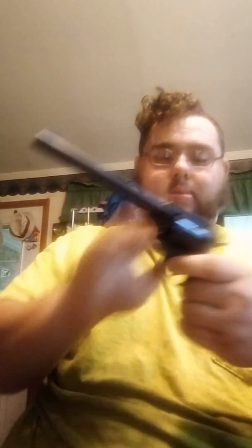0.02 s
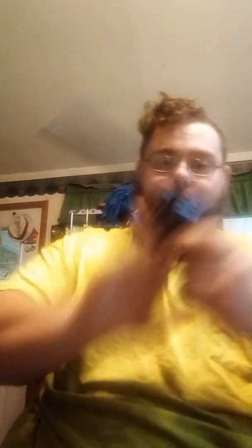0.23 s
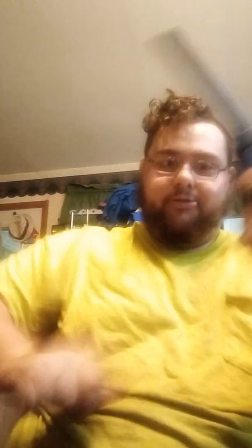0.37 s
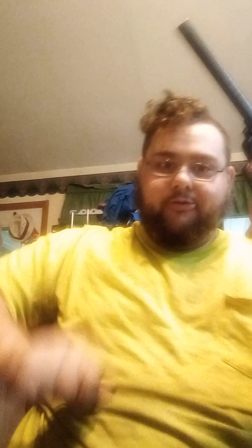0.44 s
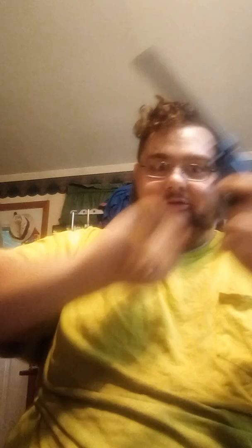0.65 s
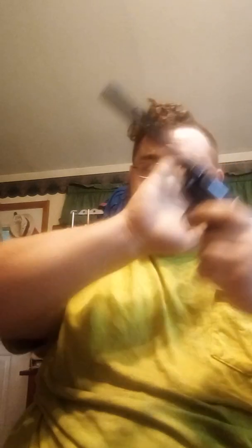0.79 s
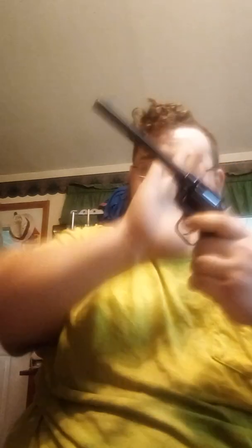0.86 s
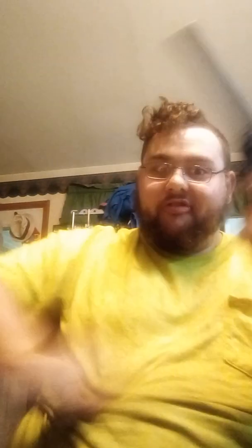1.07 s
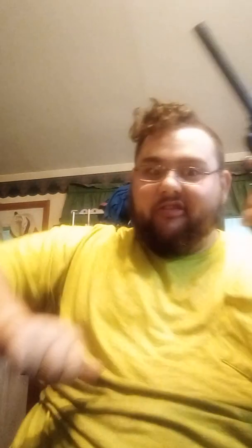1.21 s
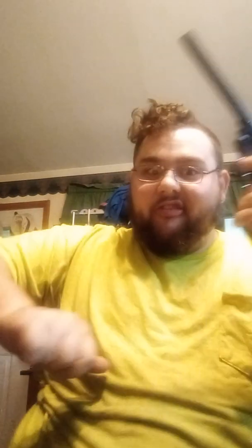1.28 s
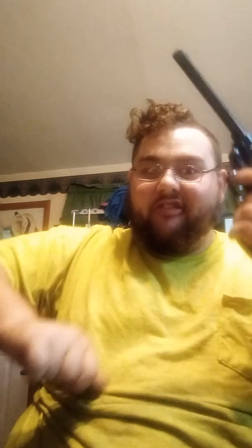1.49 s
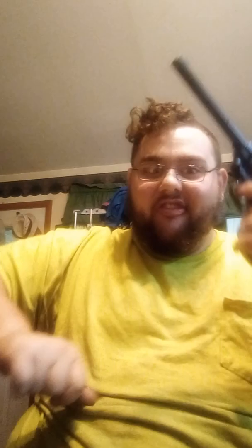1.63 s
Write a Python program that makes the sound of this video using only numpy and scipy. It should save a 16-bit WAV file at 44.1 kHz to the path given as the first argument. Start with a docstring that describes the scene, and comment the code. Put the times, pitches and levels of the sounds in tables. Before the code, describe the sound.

A revolver's cylinder is spun twice by hand, close to the microphone in a small room. Each run of rapid, bright clicks slows and settles with a clink; the second ends in a falling squeak.

```python
"""A small room with a low hum: a revolver's cylinder is spun twice by hand, close to a phone.
The pawl snaps over the ratchet, quickly and then ever more slowly; a duller tock follows each snap.
A grainy hiss of friction and room tail swells after each run of snaps; the cylinder settles with a clink.
The second spin ends in a falling squeak. Between the spins come faint, high brushing sounds,
a swish of the arm and a slap of the hand on the cylinder."""
import sys
import numpy as np
from scipy import signal
from scipy.fft import rfft, irfft
from scipy.io import wavfile

SR = 44100
rng = np.random.default_rng(int(sys.argv[2]) if len(sys.argv) > 2 else 0)


def file_out(sig):
    """Save sig as 16-bit WAV at sys.argv[1]."""
    # one column per channel
    cols = np.atleast_2d(sig).T
    # limit, then scale
    lim = np.clip(cols, -1, 1)
    pcm = np.round(lim * 32767).astype(np.int16)
    wavfile.write(sys.argv[1], SR, pcm)


N = 72765

# pawl snaps: start_s, crack_db, ring_db, knock_db
PAWL_SNAPS = [(0.2183, -25.0, -21.0, -49.0), (0.2306, -27.0, -20.0, -54.0), (0.2403, -25.0, -25.0, -56.0),
              (0.2492, -27.0, -25.0, -49.0), (0.2589, -28.0, -21.0, -41.0), (0.2686, -29.0, -22.0, -43.0),
              (0.2783, -28.0, -21.0, -38.0), (0.2886, -28.0, -22.0, -38.0), (0.299, -27.0, -22.0, -40.0),
              (0.3102, -27.0, -17.0, -49.0), (0.322, -27.0, -18.0, -44.0), (0.3349, -28.0, -18.0, -39.0),
              (0.349, -29.0, -20.0, -46.0), (0.3649, -31.0, -20.0, -52.0), (0.383, -31.0, -24.0, -62.0),
              (0.4043, -30.0, -21.0, -66.0), (0.4337, -31.0, -24.0, -62.0), (0.9374, -24.0, -23.0, -48.0),
              (0.9476, -23.0, -20.0, -41.0), (0.9556, -26.0, -23.0, -45.0), (0.9631, -25.0, -23.0, -44.0),
              (0.9719, -28.0, -21.0, -49.0), (0.98, -26.0, -22.0, -45.0), (0.9882, -26.0, -19.0, -42.0),
              (0.9963, -27.0, -22.0, -46.0), (1.0049, -27.0, -22.0, -58.0), (1.0137, -28.0, -26.0, -54.0),
              (1.0231, -27.0, -26.0, -52.0), (1.0328, -27.0, -24.0, -52.0), (1.0432, -28.0, -24.0, -48.0),
              (1.0543, -29.0, -22.0, -53.0), (1.0662, -29.0, -23.0, -46.0), (1.0788, -29.0, -24.0, -58.0),
              (1.0921, -29.0, -22.0, -61.0), (1.1064, -28.0, -22.0, -51.0), (1.122, -29.0, -22.0, -61.0),
              (1.1398, -31.0, -23.0, -59.0), (1.1612, -30.0, -29.0, -59.0), (1.1907, -28.0, -28.0, -68.0)]
# crack spectrum: freq_hz, gain_db
CRACK_SPECTRUM = [(1000, -29), (2300, -11), (3600, -2), (4400, -0.5), (5300, 5.5), (6600, 8), (7700, -1),
                  (9300, 7), (11000, 0.5), (12000, 1.5), (12800, 0), (15000, -0.5), (18000, -21)]
# pawl modes: freq_hz, level_db, t60_s
PAWL_MODES = [(15500, -4, 0.005), (15520, 12, 0.011), (15500, 2, 0.0074), (16100, 5, 0.0067),
              (17400, -8, 0.0048)]
# tock modes: freq_hz, level_db, t60_s
TOCK_MODES = [(1533, -7.5, 0.014), (2326, -9.5, 0.017), (3130, 1, 0.0093), (3450, 3.5, 0.0093),
              (5560, -8, 0.013)]
# frame knock high-pass, thinner on the second spin: time_s, cutoff_hz
KNOCK_LOW_CUT = [(.25, 59), (.94, 212)]
# grainy hiss envelope: time_s, level_db
GRAINY_HISS_ENVELOPE = [(.175, -79.5), (.21, -49.5), (.23, -37), (.3, -39.5), (.44, -41), (.5, -37),
                        (.54, -48), (.6, -56.5), (.75, -68.5), (.85, -92), (.93, -66), (.95, -37.5),
                        (1.2, -38.5), (1.26, -34), (1.31, -34), (1.37, -41.5), (1.42, -43), (1.48, -50),
                        (1.53, -69.5), (1.65, -72)]
# grainy hiss spectrum: freq_hz, gain_db
GRAINY_HISS_SPECTRUM = [(400, -34), (900, -20.5), (1400, -18.5), (1800, -10), (2400, -2), (3300, -4.5),
                        (4400, -10), (5400, 5), (6200, -3.5), (7000, 2), (8200, -9.5), (9500, -3.5),
                        (10600, -6), (11600, -3.5), (13000, -9.5), (14300, -1), (15100, 6), (16200, 7.5),
                        (17200, -7.5), (18000, -13)]
# squeak of the stopping cylinder: time_s, pitch_hz, level_db
SQUEAK_TRACK = [(1.17, 1450, -110), (1.21, 1428, -57), (1.245, 1370, -45.5), (1.28, 1210, -43),
                (1.295, 950, -42.5), (1.35, 930, -52), (1.4, 925, -51.5), (1.46, 952, -60),
                (1.53, 1000, -68.5), (1.65, 945, -72.5)]
# squeak harmonics: multiple, level_db
SQUEAK_HARMONICS = [(1, -3), (2, 7.5), (3, 4), (4, -32)]
# clinks as each spin starts and ends: start_s, level_db
CYLINDER_CLINKS = [(0.209, -41), (0.5302, -32), (0.9411, -31.5), (1.2895, -34)]
# cylinder modes: freq_hz, level_db, t60_s
CYLINDER_MODES = [(1840, -9.5, 0.0067), (2220, -19, 0.26), (2330, -18, 0.1), (2370, 3.5, 0.025),
                  (2700, 1.5, 0.0084), (3220, 1.5, 0.0083), (3590, -7, 0.016), (4048, -17, .03),
                  (6020, -8, 0.022)]
# high brushing sounds: start_s, length_s, level_db, resonance_hz, width_hz
BRUSH_EVENTS = [(.2045, .002, -46, 7000, 5000), (.628, .02, -56, 5700, 1200),
                (.6528, .013, -50, 5700, 1400), (.675, .014, -53, 5600, 1100), (.69, .036, -58, 5600, 1500),
                (.7405, .006, -56, 5600, 1800), (.7695, .033, -55, 5700, 2000),
                (.8675, .006, -57, 6400, 500), (.894, .02, -57, 5500, 1200), (.9235, .002, -45, 9000, 6000)]
# brushing spectrum: freq_hz, gain_db
BRUSH_SPECTRUM = [(1500, -32), (3500, -19), (5000, 1), (6200, 3.5), (7200, -5.5), (9500, 5.5), (12000, -10),
                  (16000, -35)]
# soft hand blows: start_s, level_db, pitch_hz, t60_s
HAND_THUMPS = [(.548, -54.5, 564, 0.052), (.735, -58, 71, 0.031), (0.89, -58, 1100, 0.13),
               (0.901, -57, 79, .08), (.9158, -36.5, 373, 0.02), (.9172, -34, 520, 0.015),
               (.9165, -39, 1400, 0.0053), (1.109, -60.5, 70, 0.04), (1.21, -64.5, 65, 0.16),
               (1.332, -60, 75, 0.045)]
# arm swish envelope: time_s, level_db
SWISH_ENVELOPE = [(0, -79), (.5, -79), (.56, -52), (.6, -73.5), (.8, -71), (.86, -62.5), (.91, -50),
                  (1.1, -69.5), (1.3, -57.5), (1.45, -59.5), (1.53, -58), (1.65, -64.5)]
# swish spectrum: freq_hz, gain_db
SWISH_SPECTRUM = [(100, 3.5), (250, -3), (600, -1), (1100, -0.5), (1700, -3.5), (3000, -4), (4200, -2.5),
                  (6000, -2), (7200, -6.5), (9000, -28), (16000, -9)]
# room tail spectrum: freq_hz, gain_db
ROOM_SPECTRUM = [(150, -5), (700, -8.5), (1500, -4), (2400, -0.5), (3500, 6.5), (6000, -4.5), (9000, 0),
                 (13000, -10), (16000, -31)]
# room hum bands: centre_hz, width_hz, level_db
HUM_BANDS = [(119.4, 15, -6), (164.6, 23, -2.5), (325, 113, -1.5), (373.4, 47, -5.5), (228, 86, -14.5),
             (620, 79, -14.5), (983, 170, -14)]
# hum envelope: time_s, level_db
HUM_ENVELOPE = [(0, -66.5), (.18, -59.5), (.25, -64), (.46, -89), (.51, -64), (.6, -66), (.7, -60),
                (.9, -63.5), (1, -65.5), (1.19, -90), (1.27, -61), (1.52, -64.5), (1.65, -64)]
# background hiss spectrum: freq_hz, gain_db
HISS_SPECTRUM = [(30, -14), (70, 23), (400, 7), (800, -7), (2000, 4.5), (5500, -38.5), (7000, -30.5),
                 (9000, -50), (13000, -62), (15500, -24), (18000, -54)]


def ratchet(chatter_s=0.0025, chatter_fall_s=0.006, release_s=0.00053, crack_fall_s=0.0094):
    """The pawl strikes and chatters: a crack, a very high ring, a frame knock, then a tock."""
    out, t = np.zeros(N), np.arange(1024) / SR
    strike = 0.74 * np.exp(-t / 0.00029)
    attack = 1 - np.exp(-t / 0.00011)
    release = np.exp(-np.maximum(t - chatter_s, 0) / release_s)
    contact = (strike + np.exp(-t / chatter_fall_s)) * attack * release
    crack_noise = noise(CRACK_SPECTRUM)
    ring_noise = convolve(rng.standard_normal(N), ring(PAWL_MODES, size=512))
    gaps_s = np.diff([row[0] for row in PAWL_SNAPS], prepend=0)
    for (start_s, crack_db, ring_db, knock_db), gap_s in zip(PAWL_SNAPS, gaps_s):
        first = int(start_s * SR)
        span = slice(first, first + len(t))
        crack = high_pass(contact * np.exp(-t / crack_fall_s) * crack_noise[span], 1400)
        pawl_ring = high_pass(contact * ring_noise[span], 4000)
        add_hit(out, start_s, crack_db, crack)
        add_hit(out, start_s, ring_db + 0.5, pawl_ring)
        add_hit(out, start_s, knock_db + 1, frame_knock(start_s))
        add_tock(out, start_s, gap_s)
    return out


def frame_knock(start_s, median_hz=520, t60_s=0.0014):
    """Heavily damped thud of the frame; pitch differs per snap."""
    t = np.arange(1024) / SR
    pitch_hz = median_hz * np.exp(0.45 * rng.standard_normal())
    thud = -np.cos(2 * np.pi * pitch_hz * t) * decay(t, t60_s)
    dulling = response([(40, -9), (120, -1), (900, -1), (2500, -2), (8000, -56)])
    cutoff_hz = np.interp(start_s, *np.array(KNOCK_LOW_CUT).T)
    return high_pass(convolve(thud, dulling), cutoff_hz)


def add_tock(out, snap_s, gap_s, delay_s=0.0105, jitter_s=0.00076, slow_gap_s=0.019):
    """Duller tock after a snap, weaker while the teeth follow closely."""
    hurry = np.clip(slow_gap_s / gap_s - 1, 0, 1)
    tock = high_pass(ring(TOCK_MODES, size=1024, scatter_db=3.0, detune=0.03), 1340)
    start_s = snap_s + delay_s + jitter_s * rng.standard_normal()
    add_hit(out, start_s, -36.5 - 7 * hurry, tock)


def grainy_hiss(grain_db=0.76):
    """Grainy hiss of cylinder friction and room tail, swelling after the snaps."""
    grain = undb(grain_db * narrow_noise(0, half_width_hz=83))
    return undb(curve(GRAINY_HISS_ENVELOPE)) * unit_rms(grain * noise(GRAINY_HISS_SPECTRUM))


def squeak(half_width_hz=70):
    """The stopping cylinder squeaks: rough harmonics on a falling pitch."""
    pitch_hz = curve(SQUEAK_TRACK)
    tone = sum(undb(level_db) * narrow_noise(multiple * pitch_hz, half_width_hz * np.sqrt(multiple))
               for multiple, level_db in SQUEAK_HARMONICS)
    return undb(curve(SQUEAK_TRACK, column=2)) * unit_rms(tone)


def clinks(rattle_fall_s=0.025):
    """An impulse and a brief rattle ring the cylinder's modes."""
    out, t = np.zeros(N), np.arange(N) / SR
    for start_s, level_db in CYLINDER_CLINKS:
        blow = (t == 0) + 0.044 * rng.standard_normal(N) * np.exp(-t / rattle_fall_s)
        clink = convolve(blow, ring(CYLINDER_MODES, size=12000, detune=0.0018))
        add_hit(out, start_s, level_db, high_pass(clink, 1870))
    return out


def brushing(tick_gap_s=0.0043, jitter_s=0.00037, scatter_db=2):
    """Short, faint, high brushing sounds with a fine ticking grain."""
    out = np.zeros(N)
    colour = response(BRUSH_SPECTRUM)
    for start_s, length_s, level_db, resonance_hz, width_hz in BRUSH_EVENTS:
        t60_s = np.log(1000) / (np.pi * width_hz)
        for tick_s in np.arange(start_s, start_s + length_s, tick_gap_s):
            late, loud = rng.standard_normal(2)
            tick = convolve(ring([(resonance_hz, 0, t60_s)], size=512, detune=0.083), colour)
            add_hit(out, tick_s + jitter_s * late, level_db + scatter_db * loud, tick)
    return out


def hand():
    """Swish of the arm; soft blows of the hand, one damped mode each."""
    out = undb(curve(SWISH_ENVELOPE)) * noise(SWISH_SPECTRUM)
    for start_s, level_db, pitch_hz, t60_s in HAND_THUMPS:
        thump = ring([(pitch_hz, 0, t60_s)], size=6000)
        add_hit(out, start_s, level_db, high_pass(thump, pitch_hz / 3))
    return out


def room(x, gain_db=-9.5, t60_s=0.49, delay_s=0.002):
    """Short diffuse tail of the room."""
    t = np.arange(N) / SR
    tail = rng.standard_normal(N) * decay(t, t60_s) * (t > delay_s)
    coloured = convolve(x, response(ROOM_SPECTRUM))
    return undb(gain_db) * convolve(coloured, tail / np.linalg.norm(tail))


def background(hiss_db=-84):
    """Wavering low hum that dips during the spins, over faint hiss."""
    hum = sum(undb(level_db) * narrow_noise(centre_hz, width_hz / 2)
              for centre_hz, width_hz, level_db in HUM_BANDS)
    return undb(curve(HUM_ENVELOPE)) * unit_rms(hum) + undb(hiss_db) * noise(HISS_SPECTRUM)


def undb(db):
    """Decibels to gain."""
    return 10 ** (np.asarray(db) / 20)


def unit_rms(x):
    """Scale to rms 1."""
    return x / np.sqrt(np.mean(x ** 2))


def decay(t, t60_s):
    """Exponential fall, 60 dB per t60_s."""
    return np.exp(-np.log(1000) * t / t60_s)


def curve(rows, column=1):
    """Table column, linearly interpolated in time."""
    rows = np.array(rows)
    return np.interp(np.arange(N) / SR, rows[:, 0], rows[:, column])


def response(spectrum, size=512):
    """Minimum-phase impulse response of a spectrum."""
    freq_hz, gain_db = np.array(spectrum).T
    bins_hz = np.maximum(np.fft.rfftfreq(size, 1 / SR), 1)
    gain = undb(np.interp(np.log(bins_hz), np.log(freq_hz), gain_db))
    cepstrum = irfft(np.log(gain))
    cepstrum[1:size // 2] *= 2
    cepstrum[size // 2 + 1:] = 0
    return irfft(np.exp(rfft(cepstrum)))


def convolve(x, impulse_response):
    """Filter, keeping the input length."""
    return signal.fftconvolve(x, impulse_response)[:len(x)]


def high_pass(x, cutoff_hz):
    """Third-order low cut."""
    return signal.sosfilt(signal.butter(3, cutoff_hz, "high", fs=SR, output="sos"), x)


def noise(spectrum):
    """Coloured noise, rms 1."""
    return unit_rms(convolve(rng.standard_normal(N), response(spectrum, size=4096)))


def narrow_noise(centre_hz, half_width_hz):
    """Noise-driven resonance, rms 1; the centre may move."""
    bins_hz = np.fft.fftfreq(N, 1 / SR)
    white = rng.standard_normal(N) + 1j * rng.standard_normal(N)
    waver = np.fft.ifft(np.fft.fft(white) / (1 + (bins_hz / half_width_hz) ** 2))
    carrier = np.exp(2j * np.pi * np.cumsum(centre_hz * np.ones(N)) / SR)
    return unit_rms((waver * carrier).real)


def ring(modes, size, scatter_db=0, detune=0):
    """Decaying modes, with optional scatter in level and pitch."""
    out, t = np.zeros(size), np.arange(size) / SR
    for freq_hz, level_db, t60_s in modes:
        loud, sharp = rng.standard_normal(2)
        tone = np.sin(2 * np.pi * freq_hz * (1 + detune * sharp) * t)
        out += undb(level_db + scatter_db * loud) * tone * decay(t, t60_s)
    return out


def add_hit(out, start_s, level_db, x):
    """Mix in a blow; level_db is the rms of its first 3 ms."""
    first = max(int(start_s * SR), 0)
    onset_rms = np.sqrt(np.mean(x[:140] ** 2))
    out[first:first + len(x)] += undb(level_db) / onset_rms * x[:max(N - first, 0)]


def scene():
    """Mono mix; only ratchet and brushing feed room()."""
    direct = grainy_hiss() + squeak() + clinks() + hand() + background()
    ticks = ratchet() + brushing()
    return (direct + ticks + room(ticks))[None]


def record(dry):
    """The phone cuts the lowest bass and the top."""
    low_cut_hz, top_hz = 47, 18000
    low_pass = signal.ellip(8, .2, 60, top_hz, fs=SR, output="sos")
    return signal.sosfilt(low_pass, high_pass(dry, low_cut_hz))


dry = scene()
out = record(dry)
file_out(out)
```